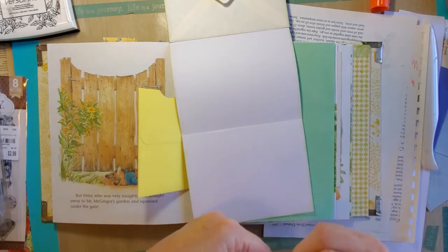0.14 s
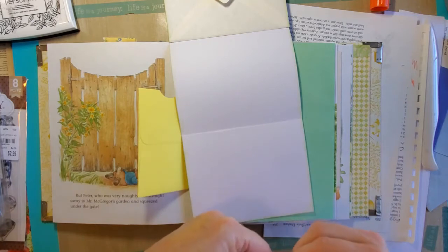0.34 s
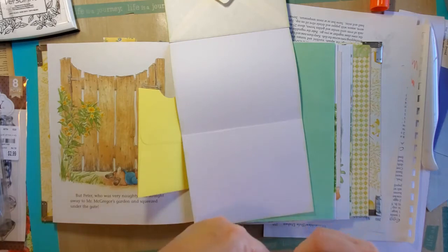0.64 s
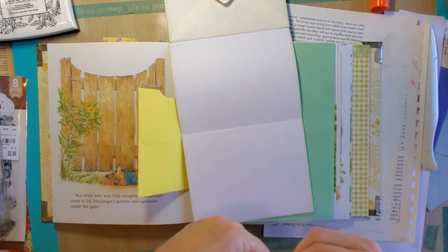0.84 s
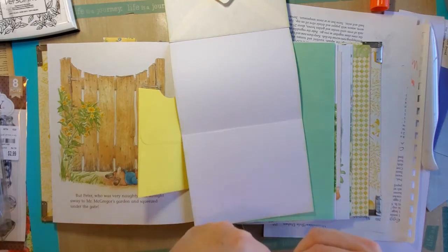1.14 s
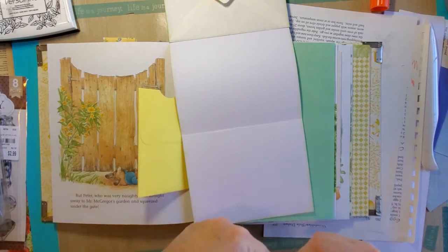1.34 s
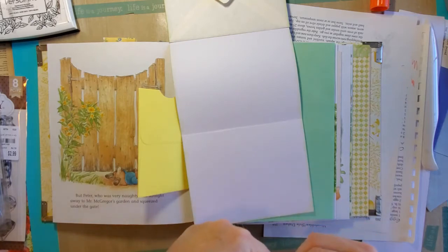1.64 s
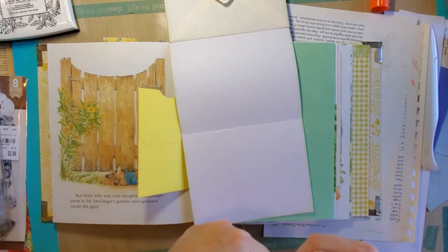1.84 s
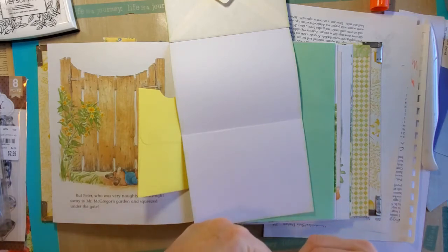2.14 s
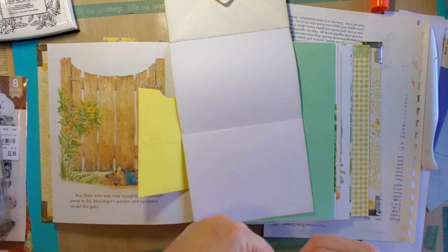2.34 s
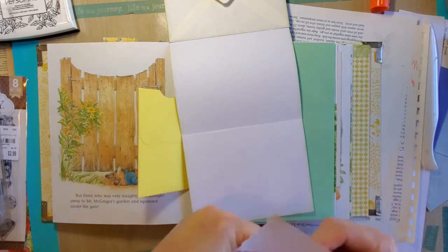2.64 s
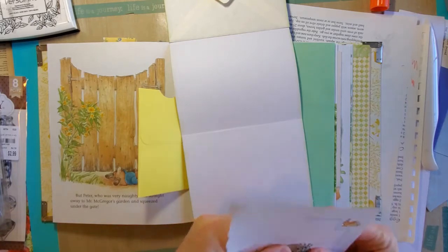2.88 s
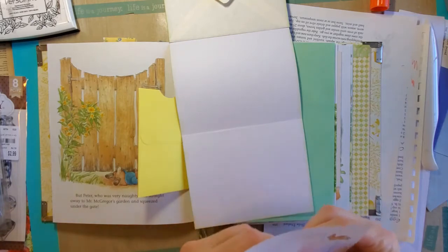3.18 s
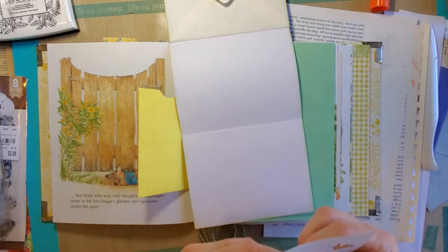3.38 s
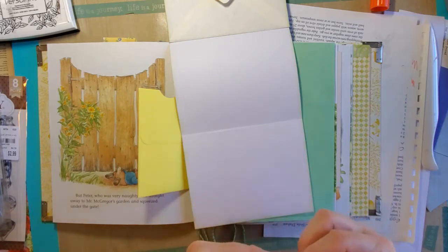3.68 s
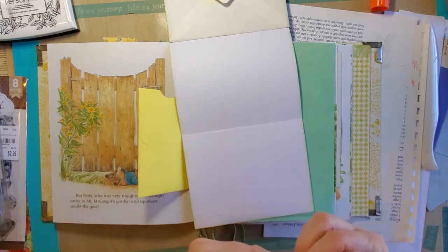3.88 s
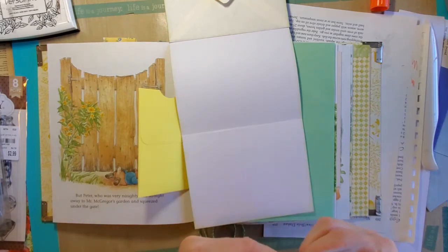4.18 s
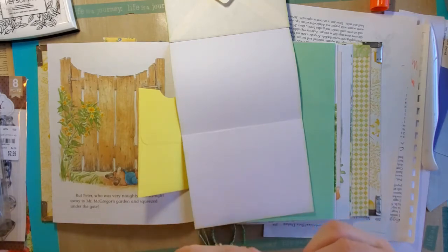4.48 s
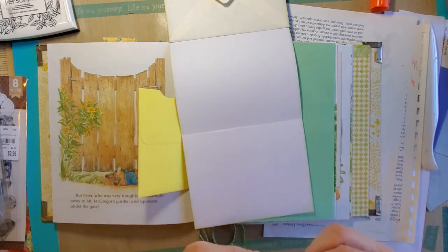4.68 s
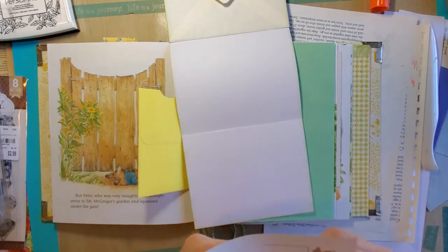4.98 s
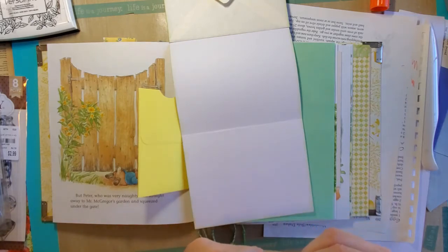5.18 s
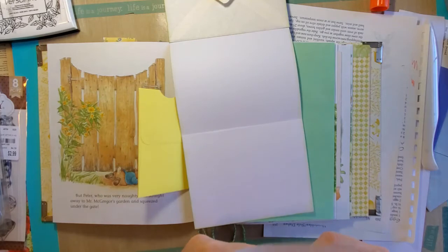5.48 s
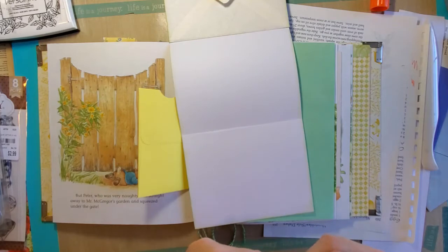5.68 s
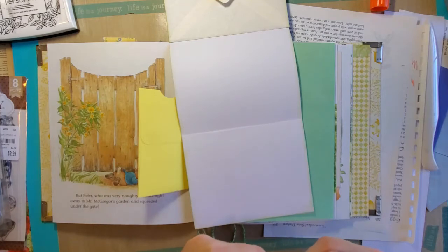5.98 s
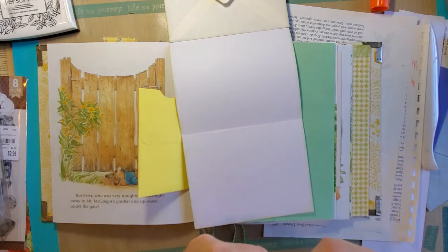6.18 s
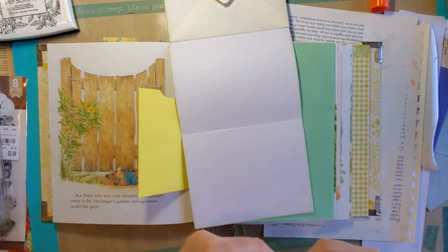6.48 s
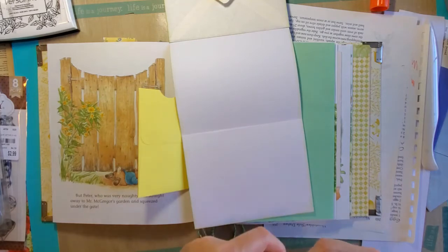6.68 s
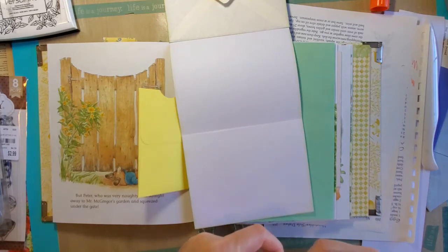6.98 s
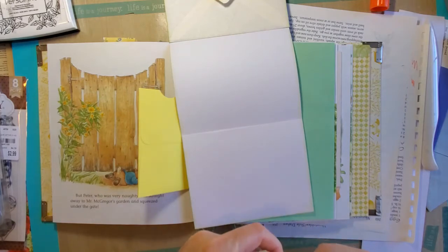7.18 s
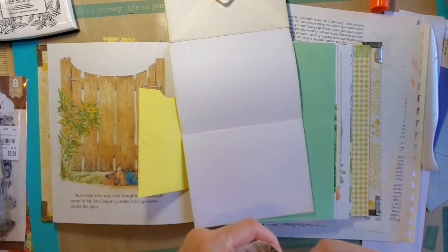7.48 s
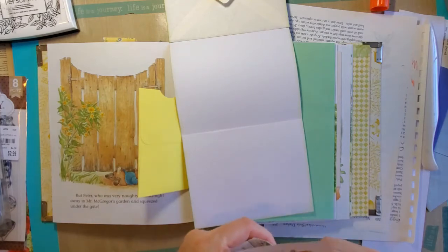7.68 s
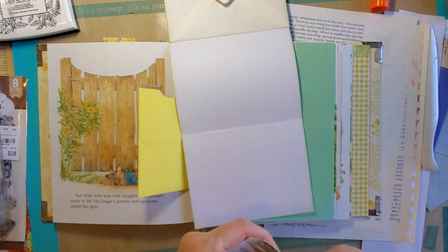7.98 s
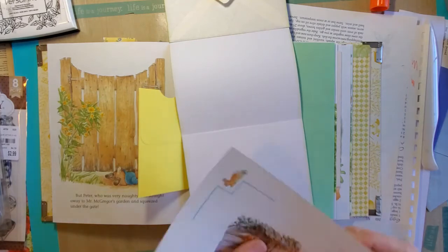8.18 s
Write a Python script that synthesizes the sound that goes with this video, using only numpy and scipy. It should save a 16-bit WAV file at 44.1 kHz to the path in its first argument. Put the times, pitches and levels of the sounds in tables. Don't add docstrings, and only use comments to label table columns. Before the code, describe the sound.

Thin paper is torn by hand at a table, close to two spaced microphones in a small furnished room with a short echo and faint hum. Soft sliding leads into a fuller, crackling rip at 0.1-0.2 s, with pops and a shaking page. A short snap follows at 0.6, a firm light knock at 1.06, a brief rip at 1.3, another knock at 1.6, and a sharp tear at 1.9. A small rip comes at 2.4, then mostly finger rubbing and faint taps until 3.4. Clustered rips run from 3.8 to 4.05, with rustling after. Short tears come at 4.8 and 5.3, a loud snapping one at 5.77, a strong crackle at 6.27, then rips at 6.8 and 7.2. A more noticeable paper slide falls at 7.0. The end is soft rustling, with a weak, slow tear and crease pops around 8.1.

```python
import sys
import numpy as np
from scipy import signal
from scipy.fft import rfft, irfft, next_fast_len
from scipy.io import wavfile
from scipy.ndimage import uniform_filter1d

SR = 44100
rng = np.random.default_rng(int(sys.argv[2]) if len(sys.argv) > 2 else 0)


def output_pcm(signal):
    pcm = np.clip(np.atleast_2d(signal).T, -1, 1) * 32767
    wavfile.write(sys.argv[1], SR, np.round(pcm).astype(np.int16))


def how_loud(loudness_db):
    steps = np.asarray(loudness_db, float) / 20
    return 10 ** steps


N = 367353

# [t/s, knock peak/dB, click re knock/dB, thud re knock/dB]
TAPS = [
    (1.0595, -32, -6, -26),
    (1.6155, -33, -6.5, -32),
    (2.714, -47.5, -14, -25),
    (2.903, -53, -20, -5),
    (3.332, -50, -11, -3),
    (3.397, -49, -24, -12),
    (4.454, -49, -22.5, -19),
    (5.772, -70, -20, 14),
    (6.005, -52.5, -2.5, -24),
]


def unit(x):
    return x / np.sqrt(np.mean(x ** 2) + 1e-20)


def along(points, hz):
    f, v = np.transpose(points)
    return np.interp(np.log(hz + 1), np.log(f + 1), v)


def filtered(x, response):
    m = next_fast_len(N + SR // 2)
    return irfft(rfft(x, m) * response(np.fft.rfftfreq(m, 1 / SR)), m)[..., :N]


def resonances(modes):
    def response(f):
        total = 0
        for k, (hz, width, db) in enumerate(modes):
            damping = 1j * f * width
            total = total + (-1) ** k * how_loud(db) * damping / (hz * hz - f * f + damping)
        return total
    return response


def panned(pan_db):
    return how_loud(np.array([pan_db / 2, -pan_db / 2]))


def paired(mid_side, response):
    # [f/Hz, correlation]
    likeness = [(40, .6), (120, .45), (300, .75), (700, .72), (1400, .62), (3100, .2), (6800, 0),
                (15000, 0)]

    def spread(hz):
        turn = np.arccos(np.clip(along(likeness, hz), -1, 1)) / 2
        return response(hz) * [np.cos(turn), np.sin(turn)]

    mid, side = filtered(mid_side, spread)
    return unit(np.array([mid + side, mid - side]))


def grains(rate_hz, spread_db, life_s, bed):
    sizes = how_loud(spread_db * np.minimum(rng.exponential(1, N), 2.8))
    cracks = (rng.random(N) < rate_hz / SR) * sizes
    envelope = bed + unit(signal.lfilter([1], [1, -np.exp(-1 / (life_s * SR))], cracks))
    steady = np.sqrt(np.abs(uniform_filter1d(envelope ** 2, size=SR // 33)) + 1e-9)
    return envelope / steady * rng.standard_normal((2, N))


def patchy(x, patchy_db):
    z = signal.stft(x, nperseg=512)[2]
    field = uniform_filter1d(rng.standard_normal(z.shape[1:]), size=6, axis=0)
    field = uniform_filter1d(field, size=8, axis=1)
    return signal.istft(z * how_loud(patchy_db * unit(field)), nperseg=512)[1][:, :N]


def clock():
    return np.arange(N * 1000 // SR + 2)[None] / 1000


def smooth(ms_values):
    ms = np.arange(N) * 1000 / SR
    return [np.interp(ms, np.arange(len(v)), v) for v in ms_values]


def swells(middle, length, db):
    return how_loud(db - 11 * (2 * (clock() - middle) / length) ** 2)


def pull():
    # [start/s, full pull/s, stop/s, crackle/dB, page re crackle/dB]
    pulls = [(0.086, 0.16, 0.215, -39, -4.5), (0.639, .66, 0.688, -42, -7),
             (1.298, 1.353, 1.375, -41, -8.5), (1.887, 1.939, 1.955, -41, -8.5),
             (2.418, 2.425, 2.455, -44, -14), (3.805, 3.9, 3.9, -44, -5), (3.922, 3.962, 3.995, -46, -12),
             (4.0, 4.044, 4.06, -48, -5), (4.787, 4.817, 4.831, -41, -9.5), (5.284, 5.29, 5.3, -47, -14),
             (5.306, 5.32, 5.335, -41, -12), (5.76, 5.774, 5.79, -41, -13), (6.253, 6.287, 6.3, -35.5, -13),
             (6.8, 6.85, 6.868, -37.5, -7), (7.196, 7.239, 7.262, -41, -10),
             (8.055, 8.08, 8.25, -54.5, -3.5)]
    # [middle/s, length/s, page/dB, flap/dB]
    buckles = [(0.163, 0.061, -42, -36.5), (.621, 0.0217, -38.5, -42.5), (1.368, 0.04, -40, -42.5),
               (1.94, 0.039, -39.5, -40), (2.704, 0.069, -56, -62.5), (1.315, .06, -75, -45),
               (3.92, .025, -45, -37), (3.862, .03, -62, -46), (3.97, .05, -60, -44), (.665, .03, -60, -43),
               (5.325, .05, -56, -42), (5.785, .04, -60, -42), (6.855, 0.06, -41, -45.5),
               (6.291, 0.0498, -44.5, -53)]
    # [middle/s, length/s, crackle/dB, strip/dB]
    surges = [(.165, .04, -46, -50), (.6, .025, -50, -60), (.662, .02, -44, -46), (1.305, .01, -44, -52),
              (1.351, .008, -37, -46), (1.385, .012, -45, -55), (1.925, .008, -43, -54),
              (1.954, .006, -42, -54), (3.862, .02, -50, -52), (3.918, .018, -36, -40),
              (3.965, .04, -48, -48), (4.8, .008, -44, -44), (4.81, .008, -44, -42), (4.822, .01, -44, -42),
              (4.845, .008, -48, -48), (5.295, .008, -46, -50), (5.32, .022, -44, -42),
              (5.332, .008, -48, -46), (6.262, .01, -44, -48), (6.281, .008, -42, -42),
              (6.294, .016, -42, -38), (6.809, .01, -44, -46), (6.826, .016, -44, -44),
              (6.848, .008, -37, -42), (6.868, .01, -44, -48), (7.202, .01, -48, -50),
              (7.22, .016, -45, -47), (7.245, .008, -41, -42), (7.26, .008, -40, -44)]
    bite_s, swell_db_per_s, sag_db_per_s, stop_db_per_s = 0.00673, 186.5, 66, 479.5
    creep_db, creep_db_per_s = -13.5, 330.5
    settle_db, settle_db_per_s = -20, 127.5
    page_late_db_per_s, flap_late_db_per_s, flap_db, flap_follows = 299.5, 109.5, -1, 0.442

    t = clock()
    start, full, stop, db, page_db = np.transpose(pulls)[..., None]
    early, late = np.maximum(full - t, 0), np.maximum(t - full, 0)
    level_db = db - swell_db_per_s * early - sag_db_per_s * late
    level_db = level_db - stop_db_per_s * np.maximum(t - stop, 0)
    creep = (t < start) * how_loud(level_db + creep_db - creep_db_per_s * np.maximum(start - t, 0))
    settle = (t > stop) * how_loud(db + settle_db - settle_db_per_s * late)
    tear = np.clip((t - start) / bite_s, 0, 1) * how_loud(level_db) + creep + settle
    page = tear * how_loud(page_db - page_late_db_per_s * early)
    flap = tear * how_loud(flap_db + flap_follows * page_db - flap_late_db_per_s * early)

    middle, length, page_shake_db, flap_shake_db = np.transpose(buckles)[..., None]
    page = np.vstack([page, swells(middle, length, page_shake_db)])
    flap = np.vstack([flap, swells(middle, length, flap_shake_db)])
    middle, length, surge_db, strip_db = np.transpose(surges)[..., None]
    tear = np.vstack([tear, swells(middle, length, surge_db)])
    strip = swells(middle, length, strip_db)
    return smooth([np.linalg.norm(g, axis=0) for g in (tear, page, flap, strip)])


def rips():
    # [f/Hz, density/dB]
    crackle_spectrum = [(600, -90.5), (1800, -43), (3200, -1.5), (4300, 0), (6000, -1.5), (8200, -5),
                        (11000, -5), (15000, -5.5), (17000, -24)]
    # [f/Hz, width/Hz, level/dB]
    page_modes = [(341.2, 34.2, -14), (544, 30, 1), (676.6, 30.2, -1.5), (1100, 192.7, 6.5),
                  (1502, 541, -1)]
    flap_modes = [(1800, 441, -3.5), (2184.5, 239, 4.5), (2892, 396, -2), (3491, 174, 3)]
    strip_modes = [(4350, 350, 0), (5700, 500, -5)]

    def page_response(hz):
        return resonances(page_modes)(hz) / (1 + (hz / 1900) ** 4) / (1 + (260 / (hz + 1)) ** 4)

    def flap_response(hz):
        return resonances(flap_modes)(hz) / (1 + (1400 / (hz + 1)) ** 4)

    tear, page, flap, strip = pull()
    fibres = patchy(grains(rate_hz=1300, spread_db=4.0, life_s=0.0003, bed=1.0), patchy_db=1.3)
    crackle = tear * paired(fibres, lambda hz: how_loud(along(crackle_spectrum, hz)))
    drumming = page * how_loud(-1.44) * paired(fibres, page_response)
    flapping = flap * how_loud(-2.5) * paired(fibres, flap_response)
    ringing = strip * how_loud(-4.5) * paired(fibres, resonances(strip_modes))
    return how_loud(1.0) * (crackle + drumming + flapping + ringing)


def snaps():
    # [t/s, peak/dB, f/Hz, left-right/dB]
    jumps = [(.107, -36, 2000, -2.5), (.112, -26.5, 2100, .5), (.13, -28, 1096, -2.5), (.142, -30, 1200, 0),
             (.183, -28, 3700, -5), (.195, -28.5, 1350, -2), (.2025, -27, 1100, 2), (.216, -30, 3000, 3),
             (.612, -31, 1300, 0), (.6165, -23, 1250, 0), (.6415, -35, 2170, 3), (1.302, -38, 5730, -4.5),
             (1.329, -31, 2180, 0), (1.358, -26, 1150, 2), (1.362, -27, 1100, 2), (1.352, -29.5, 3000, -5),
             (1.895, -37.5, 2970, 0), (1.932, -18.5, 2770, -0.5), (1.94, -32, 1800, 3),
             (1.954, -22, 2910, -6), (1.968, -27, 3280, -2), (2.422, -36, 3340, 4), (2.452, -28, 2957, -5),
             (3.877, -34, 3320, -4.5), (3.911, -28, 3490, 0.5), (3.919, -26, 3840, 0),
             (3.977, -35, 3920, 2.5), (4.791, -30.5, 4210, 2.5), (5.288, -34.5, 2770, 5.5),
             (5.313, -35, 3000, 5), (5.7655, -14, 2800, -9), (6.271, -25.5, 4510, 7.5),
             (6.807, -33.5, 4300, 9), (6.835, -27, 1100, 0), (6.847, -22, 3300, -5.5),
             (6.855, -26, 1150, 0), (7.259, -29, 3252, 4.5), (7.243, -29, 1492, 5)]
    # [t/s, peak/dB, f/Hz]
    creases = [(.089, -39.5, 1360), (.568, -43.5, 2740), (.756, -43, 1020), (1.2795, -46, 3820),
               (5.98, -47, 4050), (1.867, -42.5, 3420), (2.054, -44.5, 4540), (2.641, -46.5, 2820),
               (3.809, -36, 2552), (3.909, -28.5, 996), (4.173, -44.5, 1060), (4.228, -42, 1139),
               (4.445, -36.5, 3392), (5.04, -40.5, 4270), (5.7335, -42, 3180), (5.749, -37.5, 3200),
               (5.896, -39.5, 3020), (6.219, -42, 5770), (6.382, -46, 3140), (6.577, -44, 1960),
               (6.783, -42, 2950), (.595, -36, 1580), (3.857, -42, 2950), (4.042, -40, 1150),
               (7.189, -40, 5480), (7.325, -43.5, 4000), (7.351, -38, 4260), (7.468, -44.5, 1476),
               (7.854, -37.5, 5840), (8.039, -41, 5440), (8.079, -30.5, 1510), (8.162, -35, 1284)]
    jump_crack_db, crease_crack_db, crack_lags = -18, -14, 0.87
    nail_hz, nail_db, nail_crack_db = 2300, 18, -40
    nail_top_hz = 4600

    flips = [(*row, jump_crack_db - crack_lags * (row[1] + 30)) for row in jumps]
    flips += [(*row, 0, crease_crack_db) for row in creases]
    paper_count = len(flips)
    flips += [(s, db + click_db + nail_db, nail_hz, 0, nail_crack_db) for s, db, click_db, _ in TAPS]

    paper, nail = np.zeros((2, N + SR)), np.zeros((2, N + SR))
    t = np.arange(SR // 25) / SR
    for k, (s, db, hz, pan_db, crack_db) in enumerate(flips):
        out = paper if k < paper_count else nail
        noise = rng.standard_normal((4, len(t)))
        phase = 2 * np.pi * np.cumsum(hz * (0.486 + 0.8163 * np.exp(-t / 0.001775))) / SR
        pop = np.sin(phase) * how_loud(-60 * t / 0.00611) * (1 - np.exp(-t / 0.000132))
        band = signal.butter(1, [0.487 * hz, min(1.395 * hz, SR / 2.5)], "band", fs=SR)
        shudder = unit(signal.lfilter(*band, noise[:2] + 0.524 * noise[0])) * how_loud(-5.5 - 60 * t / 0.0211)
        crack = unit(np.diff(noise[2:], 2, prepend=0, append=0)) * how_loud(crack_db + 9.5 - 60 * t / 0.0104)
        gains = how_loud(db - 2.0) * panned(0.39 * pan_db)[:, None]
        out[:, round(s * SR):][:, :len(t)] += gains * (pop + shudder + crack)

    def nail_response(hz):
        return resonances([(nail_top_hz / 2, nail_top_hz, 0)])(hz) / (1 + 1j * hz / nail_top_hz) ** 3

    both = paper[:, :N] + filtered(nail[:, :N], nail_response)
    return filtered(both, lambda hz: (1j * hz / (450 + 1j * hz)) ** 2)


def ticks():
    # [t/s, peak above 7 kHz/dB, body re peak/dB]
    fibre_cracks = [(0.0854, -44, -13), (0.0897, -32, -20), (0.1022, -29, -17), (0.1111, -28, -17),
                    (0.1306, -28, -8), (0.2024, -32, -8), (0.5671, -42, -16), (0.5861, -36, -19),
                    (0.5954, -42, -11), (0.6075, -37, -8), (0.6409, -24, -17), (0.6574, -31, -9),
                    (0.6994, -34, -14), (0.7547, -49, -5), (1.279, -41, -13), (1.2935, -41, -6),
                    (1.3024, -38, -6), (1.3279, -33, -5), (1.3508, -30, -7), (1.3654, -32, -11),
                    (1.3854, -35, -12), (1.8277, -50, -12), (1.8502, -42, -18), (1.8574, -44, -9),
                    (1.8677, -46, -6), (1.8734, -42, -8), (1.8926, -33, -15), (1.915, -37, 3),
                    (1.9314, -33, 3), (1.9415, -27, -7), (2.4069, -38, -6), (2.4289, -32, -8),
                    (2.4513, -29, -9), (2.6399, -50, -3), (2.9924, -52, -3), (3.8082, -33, -13),
                    (3.8724, -38, -7), (3.8766, -37, -8), (3.8994, -38, -6), (3.9074, -29, -5),
                    (3.9764, -34, -11), (4.79, -35, -7), (4.798, -33, -6), (5.2864, -39, -6),
                    (5.2924, -35, -11), (5.3074, -33, -6), (5.7483, -33, 7), (5.7648, -26, 2),
                    (6.2422, -32, -1), (6.2701, -25, -8), (6.3014, -30, -9), (6.4363, -41, -10),
                    (6.7825, -39, -5), (6.8074, -31, -4), (6.8458, -26, -6), (6.8844, -36, -8),
                    (7.1891, -39, -10), (7.199, -37, -5), (7.2434, -31, -7), (7.2574, -31, -6)]
    late_s, rise_s, t60_s = 0.0008, 0.0003, 0.009

    bands, t = np.zeros((2, 2, N + SR)), np.arange(SR // 100) / SR
    shape = how_loud(-60 * t / t60_s) * (1 - np.exp(-t / rise_s))
    for s, db, body_db in fibre_cracks:
        gains = how_loud(db + np.array([0, body_db]))[:, None, None]
        burst = gains * shape * rng.standard_normal((2, len(t)))
        bands[..., round((s + late_s) * SR):][..., :len(t)] += burst
    bright = filtered(bands[0, :, :N], lambda hz: (1j * hz / (5500 + 1j * hz)) ** 3)
    body = filtered(bands[1, :, :N], resonances([(4000, 4500, 0)]))
    return how_loud(6.0) * bright + how_loud(3.0) * body


def touch():
    # [middle/s, length/s, hiss/dB, rustle re hiss/dB]
    glides = [(0.459, 0.36, -60, 2), (.995, 0.0533, -54.5, 1.5), (1.508, 0.1825, -59, -4),
              (1.719, 0.1064, -69.5, 6), (1.865, 0.0915, -54.5, -14), (2.378, 0.154, -63.5, -4),
              (2.543, 0.235, -61.5, -2.5), (2.754, 0.152, -53.5, -5.5), (2.889, 0.149, -54, -7.5),
              (3.006, 0.16, -57, 0.5), (3.161, 0.199, -52, -4.5), (3.356, .18, -59, -4),
              (3.517, 0.138, -52, 1.5), (3.643, 0.155, -66, 1), (4.292, 0.25, -59, -4.5),
              (4.359, 0.0394, -53, -5.5), (4.606, 0.11, -59.5, -9), (4.988, 0.138, -57, -5.5),
              (5.132, 0.09, -57, -4), (5.563, 0.09975, -63.5, -0.5), (5.62, .11, -60, 2.5),
              (6.081, 0.123, -64, -4), (6.21, 0.061, -62, -14), (6.495, 0.135, -52, 0),
              (7.006, 0.1068, -46.5, -3.5), (7.167, 0.051, -61, -6), (7.853, 0.054, -53, -2),
              (7.923, 0.1113, -52, -1.5), (8.17, 0.058, -58, 7), (8.33, 0.157, -62, -2.5)]
    # [start/s, time to lose 10 dB/s, hiss/dB, rustle re hiss/dB]
    grip_slips = [(0, .085, -51.5, -2.5), (.24, 0.1182, -54, 2), (.57, 0.2514, -54, -4.5),
                  (.75, 0.1536, -55, -3.5), (1.0, 0.03, -59.5, 6), (1.08, 0.1029, -67.5, 10.5),
                  (2.06, 0.1031, -55.5, -4.5), (2.59, 0.22, -62.5, -1), (2.635, 0.1886, -54.5, -0.5),
                  (3.75, .3, -65, 2), (4.09, 0.0951, -55, -2), (4.385, .1, -54.5, -8),
                  (4.44, 0.04, -53.5, -2), (4.932, 0.17, -55, -3.5), (5.05, 0.0713, -53.5, -4),
                  (5.43, 0.19, -56, -6.5), (5.83, 0.0939, -57.5, 1), (5.89, 0.0217, -56, -1),
                  (5.93, 0.077, -60, 0.5), (6.43, .06, -55, 2.5), (6.575, 0.08, -52.5, -3),
                  (6.69, 0.0675, -60, 0.5), (6.782, .03, -53, -3), (7.09, 0.0429, -68, 7.5),
                  (7.345, 0.0264, -48, -3), (7.465, 0.01, -63.5, 0.5), (7.705, 0.53, -64.5, 0),
                  (8.015, .1, -55, -5), (8.2, 0.57, -63.5, 0)]
    # [middle/s, length/s, level/dB]
    bends = [(0.031, 0.072, -73), (.16, 0.122, -58), (.77, 0.047, -69.5), (0.997, 0.045, -68),
             (1.949, 0.062, -51.5), (2.283, 0.0354, -78.5), (2.561, 0.049, -73), (2.664, 0.083, -67.5),
             (2.821, .04, -73.5), (3.499, 0.226, -77.5), (3.84, 0.08, -68), (3.981, 0.132, -61),
             (4.116, 0.082, -67.5), (4.231, 0.0525, -66.5), (4.36, 0.048, -70.5), (4.473, 0.0544, -62.5),
             (5.069, 0.0435, -72), (5.142, 0.096, -66.5), (5.363, 0.061, -67), (5.634, 0.0895, -69.5),
             (5.912, 0.058, -65), (6.03, 0.091, -72.5), (6.294, 0.0802, -62), (6.447, 0.0463, -64.5),
             (6.562, 0.088, -68.5), (6.85, 0.073, -51.5), (6.97, .07, -67), (7.112, .05, -70),
             (7.352, 0.0567, -69), (7.47, 0.0404, -77.5)]
    slip_rise_s = 0.00934
    flutter_db, bend_db = -21.5, 4.5

    middle, length, glide_db, glide_rustle_db = np.transpose(glides)[..., None]
    start, fade, slip_db, slip_rustle_db = np.transpose(grip_slips)[..., None]
    since = clock() - start
    slips = np.clip(since / slip_rise_s, 0, 1) * how_loud(slip_db - 10 * np.maximum(since, 0) / fade)
    hiss = np.vstack([swells(middle, length, glide_db), slips])
    rustle = hiss * how_loud(np.vstack([glide_rustle_db, slip_rustle_db]))
    bending = swells(*np.transpose(bends)[..., None])
    flutter = np.vstack([how_loud(flutter_db) * rustle, how_loud(bend_db) * bending])
    return smooth([np.linalg.norm(g, axis=0) for g in (hiss, rustle, flutter)])


def rubs():
    # [f/Hz, density/dB]
    hiss_spectrum = [(1000, -90.5), (2500, -18), (4500, -6), (6700, 0), (8300, -5), (12000, -6),
                     (15000, -9), (17000, -16.5)]
    rustle_spectrum = [(300, -87.5), (700, -32), (900, -8), (1050, 1.5), (1700, -1), (3200, -1), (4500, -4),
                       (7000, -43.5), (10000, -91.5)]
    flutter_spectrum = [(70, -91.5), (160, -18), (260, -7.5), (380, -2), (550, 2.5), (800, -3.5),
                        (1000, -14.5), (1600, -90.5)]

    hissing, rustling, fluttering = touch()
    skin = patchy(grains(rate_hz=400, spread_db=3.0, life_s=0.0012, bed=1.8), patchy_db=2.3)
    hiss = paired(skin, lambda hz: how_loud(along(hiss_spectrum, hz)))
    rustle = paired(skin, lambda hz: how_loud(along(rustle_spectrum, hz)))
    flutter = paired(patchy(skin, patchy_db=1.3), lambda hz: how_loud(along(flutter_spectrum, hz)))
    return how_loud(-1.5) * (hissing * hiss + rustling * how_loud(-1.88) * rustle + fluttering * how_loud(-3.5) * flutter)


def taps():
    # [f/Hz, width/Hz]
    top_bands = [(260, 253), (1000, 770), (2900, 730)]

    bands, t = np.zeros((3, 2, N + SR)), np.arange(SR // 6) / SR
    for s, db, click_db, thud_db in TAPS:
        for band, (hz, width), level_db in zip(bands, top_bands, (thud_db, 0, click_db)):
            noise = rng.standard_normal((3, len(t)))
            contact_s = max(0.00413, 3.5 / hz)
            contact = np.sin(np.pi * np.clip(t / contact_s, 0, 1)) ** 0.56
            wander = 0.83 * np.cumsum(noise[0]) * np.sqrt(width / SR)
            blow = contact * np.sin(2 * np.pi * hz * t + wander)
            scatter = noise[1] + 0.72 * noise[2] * np.array([[1], [-1]])
            ringing = how_loud(-1.5 - 60 * t / 0.13) * scatter
            band[:, round(s * SR):][:, :len(t)] += how_loud(db + level_db + 0.5) * (blow + ringing)

    total = np.zeros((2, N))
    for band, (hz, width) in zip(bands, top_bands):
        mode = resonances([(hz, 2 * width, 0)])
        total += filtered(band[:, :N], lambda f: mode(f) ** 2)
    return total


def room(x):
    # [f/Hz, t60/s]
    decay = [(300, 0.2207), (1500, 0.127), (5000, 0.1464), (12000, 0.0733)]
    hz, t, z = signal.stft(rng.standard_normal((2, SR // 3)), SR, nperseg=256)
    tail = signal.istft(z * how_loud(-60 * t / along(decay, hz)[:, None]), SR, nperseg=256)[1]
    tail = tail / np.linalg.norm(tail[0])
    delayed = np.pad(x.mean(0), (130, 0))[None]
    echo = signal.fftconvolve(delayed, tail, axes=1)[:, :N]
    return paired(echo, np.ones_like) * np.std(echo)


def hum():
    # [f/Hz, density/dB]
    hum_spectrum = [(20, -10), (50, 1), (120, -4.5), (250, -11.5), (750, -20.5), (1100, -22.5), (3100, -7),
                    (4600, -15), (6700, -6), (8200, -21), (16000, -21)]
    noise = patchy(rng.standard_normal((2, N)), patchy_db=1.3)
    return how_loud(-69.5) * paired(noise, lambda hz: how_loud(along(hum_spectrum, hz)))


def scene():
    torn, popped, tapped = rips(), snaps() + ticks(), taps()
    echo = room(how_loud(-9.0) * torn + how_loud(-3.5) * popped + how_loud(-10.5) * tapped)
    return torn + popped + tapped + rubs() + echo + hum()


def roll_off(x):
    return signal.sosfilt(signal.butter(12, 17000, fs=SR, output="sos"), x)


def record(dry):
    # [f/Hz, left-right/dB]
    balance = [(200, -1), (700, .5), (1300, 1.5), (2400, 2), (4400, -.5), (8100, -2), (15000, -.5)]

    def microphones(hz):
        lag = np.exp(-2j * np.pi * hz * np.array([[1.3 / SR], [0]]))
        return lag * panned(along(balance, hz)) * np.where(hz < 15750, 1, how_loud(-36.0))

    return roll_off(filtered(dry, microphones))


dry = scene()
out = record(dry)
output_pcm(out)
```